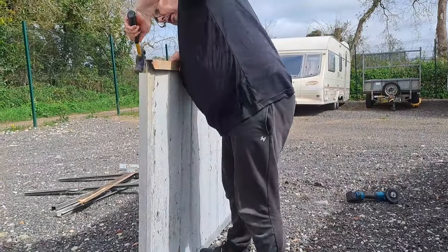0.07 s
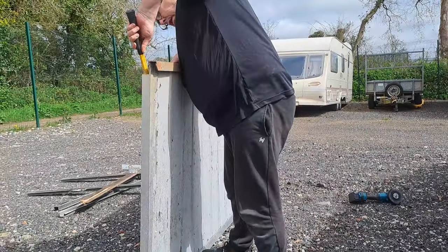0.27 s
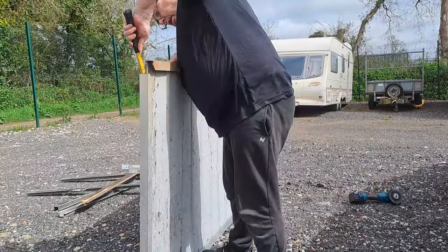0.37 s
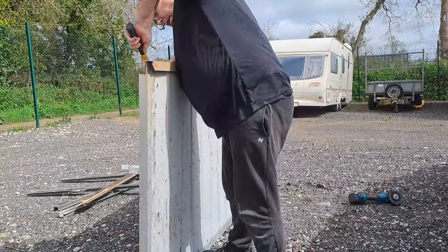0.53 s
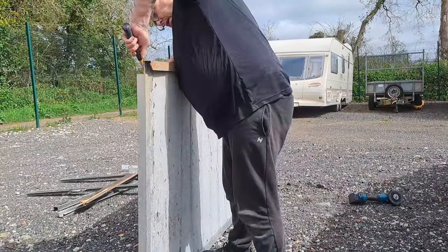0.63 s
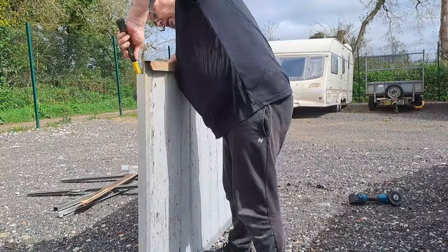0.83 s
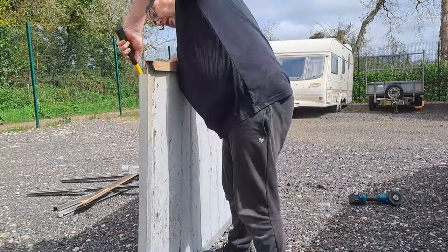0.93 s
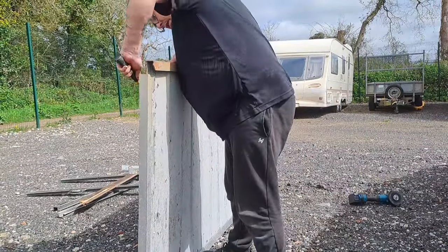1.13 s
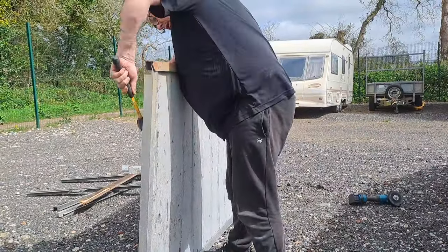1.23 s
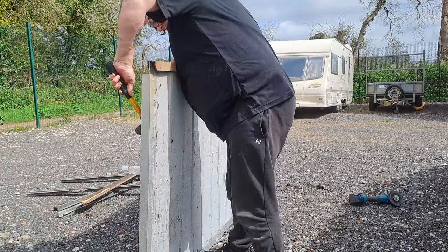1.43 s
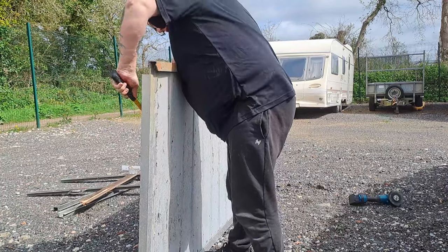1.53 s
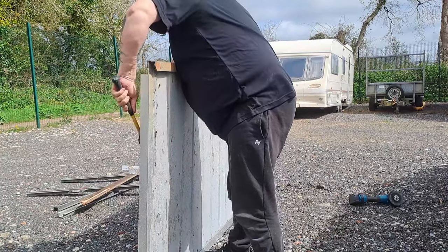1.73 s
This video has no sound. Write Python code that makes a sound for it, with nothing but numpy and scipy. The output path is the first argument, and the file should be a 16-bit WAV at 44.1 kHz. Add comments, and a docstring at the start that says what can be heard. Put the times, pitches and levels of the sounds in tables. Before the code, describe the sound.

Three hammer blows land on long steel sheets close to the microphone, as an earlier hit dies away. Every sharp crack opens into a metallic crash, with a low boom and rattling sheets, in a quiet outdoor yard.

```python
"""A hammer strikes the edge of an upright stack of long steel sheets three times, close by and outdoors.
Each impact gives a bright crack and excites densely spaced bending modes, heard as a crash; the low
modes build up late and boom on. The loose sheets flex, buckle, clap and chatter until they settle
and damp one another. An earlier blow is still dying away at first, over faint open air."""
import sys
import numpy as np
from scipy.fft import rfft, irfft, next_fast_len
from scipy.io import wavfile
from scipy.ndimage import map_coordinates

SR = 44100
rng = np.random.default_rng(int(sys.argv[2]) if len(sys.argv) > 2 else 0)


def inscribe(sig):
    """Save sig as 16-bit PCM at rate SR to the path in sys.argv[1].

    A 1-D sig is mono; a 2-D sig holds one channel per row.
    Samples are clipped to [-1, 1] before scaling.
    """
    pcm = np.round(np.clip(np.atleast_2d(sig).T, -1, 1) * 32767)
    wavfile.write(sys.argv[1], SR, pcm.astype(np.int16))


N = 79380


def amp(db):
    """Amplitude ratio of a level in decibels."""
    return 10 ** (np.asarray(db) / 20)


def unit(x):
    """Normalisation to an rms of 1."""
    return x / np.sqrt(np.mean(x ** 2) + 1e-20)


def along(points, hz):
    """Interpolation of (Hz, value) points on a logarithmic frequency axis."""
    freqs, values = np.transpose(points)
    return np.interp(np.log(hz + 1), np.log(freqs + 1), values)


def above(hz, edge_hz):
    """High-pass weighting: a smooth step from 0 to 1."""
    return 1 - 1 / (1 + (hz / edge_hz) ** 4)


def filtered(x, response):
    """Linear filtering: the spectrum times a frequency response."""
    size = next_fast_len(N + SR // 4)
    return irfft(rfft(x, size) * response(np.fft.rfftfreq(size, 1 / SR)), size)[..., :N]


def wobble(knots_per_s):
    """Smooth random modulation."""
    return map_coordinates(rng.standard_normal(N // 16), [np.arange(N) * knots_per_s / SR], mode="wrap")


def since(start):
    """Seconds after the start, zero before it."""
    return np.maximum(np.arange(N) / SR - start, 0)


def ring(t, rise_s, t60_s):
    """Envelope of a damped resonator: a soft rise and an exponential decay."""
    return (1 - np.exp(-t / rise_s)) * amp(-60 * t / t60_s)


def ripple(hz, spacing_hz, depth_db):
    """Uneven excitation: each contact favours other modes, leaving random peaks and gaps in the treble."""
    knots = rng.standard_normal(SR // 32)
    peaks = np.interp(hz / spacing_hz, np.arange(len(knots)), knots) * np.sqrt(1.5)
    return amp(depth_db * above(hz, 1400) * peaks)


# Likeness of the two channels. Each row: frequency in Hz, correlation from -1 to 1.
CORRELATION = [(30, .68), (130, .92), (260, .95), (500, .86), (1000, .78), (2000, .63), (4000, .08),
               (8000, -.08), (13000, .1)]


def wide_noise(gain):
    """Spatial coherence: an extended source is alike left and right in the bass, unrelated in the treble."""
    def mid_and_side(hz):
        angle = np.arccos(np.clip(along(CORRELATION, hz), -1, 1)) / 2
        return gain(hz) * np.array([np.cos(angle), np.sin(angle)])
    mid, side = filtered(rng.standard_normal((2, N)), mid_and_side)
    return unit(np.array([mid + side, mid - side]))


# Spectrum of the open air. Each row: frequency in Hz, relative level in dB.
AIR_SPECTRUM = [(20, -6.5), (50, -1), (110, -20.5), (220, -9.5), (700, -13), (2000, -31), (6000, -39.5),
                (16000, -55)]


def open_air():
    """Ambient noise: a faint low rumble whose level wanders."""
    return amp(-56.5 + 3.5 * wobble(6.5)) * wide_noise(lambda hz: amp(along(AIR_SPECTRUM, hz)))


# Bowing of the sheets. Each row: start in seconds, relative level in dB.
FLEXES = [(.005, -32), (.087, -31.5), (0.217, -18), (.32, -28), (0.419, -22.5), (0.577, -34.5),
          (.662, -34.5), (.74, -26), (.845, -22), (.965, -35), (1.242, -34.5), (1.33, -32), (1.46, -35),
          (1.54, -32)]
# Spectrum of a thump. Each row: frequency in Hz, relative level in dB.
FLEX_SPECTRUM = [(20, -25), (45, -4), (65, 1.5), (90, -2.5), (120, 0), (170, -15), (300, -19.5),
                 (1000, -54.5), (4000, -100)]


def flexes():
    """Flexural motion: the long sheets bow and radiate soft low thumps."""
    envelope = sum(amp(db) * ring(since(start), rise_s=.0081, t60_s=.29) for start, db in FLEXES)
    return envelope * wide_noise(lambda hz: amp(along(FLEX_SPECTRUM, hz)))


# Rebounds of the hammer head onto a sheet edge. Each row: start in seconds, relative level in dB.
CLANKS = [(.788, -10.5), (1.3305, -19), (1.4095, -14)]
# Modes of an edge. Each row: frequency in Hz, relative level in dB.
EDGE_MODES = [(2480, -9), (3030, -8), (3220, -2.5), (3400, -4), (3590, -2.5), (3760, -6), (3920, 1.5),
              (4080, -5.5), (4520, -11), (5230, -10)]
CONTACT_RISE_S = .0014


def clanks():
    """Free vibration: a struck edge rings briefly, each mode with its own phase in each channel."""
    out = np.zeros((2, N))
    for start, db in CLANKS:
        t = since(start)
        tones = sum(amp(level) * np.sin(2 * np.pi * (hz * t + rng.random((2, 1))))
                    for hz, level in EDGE_MODES)
        out += amp(db - 1.5) * ring(t, CONTACT_RISE_S, t60_s=.031) * tones
    return out


# Collisions between sheets. Each row: start in seconds, relative level in dB, treble gain in dB.
CLAPS = [(0.01, -34, -7.5), (0.084, -43, -5.5), (.161, -36.5, -13.5), (0.2289, -8.5, -3.5),
         (0.267, -20.5, -4), (0.303, -28, 3.5), (0.339, -25.5, -2), (0.409, -29.5, -5), (0.444, -39.5, 7),
         (0.4564, -30.5, 4), (0.478, -29, -8.5), (.504, -35, -3), (0.519, -38, -22), (0.576, -43.5, 1),
         (0.599, -39.5, -3), (0.631, -46, -9), (.677, -52, -8), (0.761, -19.5, 5.5), (0.787, -18, 1),
         (0.801, -15, -8), (.867, -26, 3.5), (0.892, -32, -1.5), (0.929, -36, 1), (0.976, -38, 6),
         (0.984, -46, 4), (1.007, -35.5, 1), (1.0754, -34.5, -5.5), (1.118, -35, -6.5), (1.298, -23.5, 7.5),
         (1.3312, -12, -1), (1.4087, -31, 12.5), (1.451, -31, 4.5), (1.476, -24, -18), (1.502, -27, -2.5),
         (1.528, -33, 6), (1.559, -28, -5.5), (1.586, -34.5, 2.5), (1.627, -32.5, -7), (1.706, -48.5, -0.5)]
# Spectrum of a clap. Each row: frequency in Hz, relative level in dB.
CLAP_SPECTRUM = [(100, -16.5), (400, -1.5), (1500, 0.5), (2600, -3), (3300, 0.5), (3750, -7.5), (4100, 1.5),
                 (4500, -9.5), (5200, -8.5), (8500, -15.5), (12000, -11.5), (16000, -24.5)]


def claps(places=4):
    """Impact noise: swinging sheets collide at a few places in turn, each slap a short metallic burst."""
    out = np.zeros((2, N))
    for place in range(places):
        burst = wide_noise(lambda hz: amp(along(CLAP_SPECTRUM, hz)) * ripple(hz, 130, depth_db=3.5))
        highs = filtered(burst, lambda hz: above(hz, 3000))
        for start, db, treble in CLAPS[place::places]:
            body = ring(since(start), CONTACT_RISE_S, t60_s=.089)
            snap = amp(-3) * ring(since(start), CONTACT_RISE_S, t60_s=.0096)
            out += amp(db + 1.5) * (body + snap) * (burst + (amp(treble) - 1) * highs)
    return out


# Resonances of buckling sheets. Each row: start in seconds, frequency in Hz, relative level in dB.
BARKS = [(.225, 228, -19), (.228, 895, -16), (0.26, 1380, -20.5), (.735, 440, -24), (.738, 1000, -23.5),
         (.735, 2280, -24), (1.283, 252, -11), (1.284, 440, -13.5), (1.283, 925, -26)]


def barks():
    """Buckling: just after a blow, a few resonances sound as short hollow tones."""
    out = np.zeros(N)
    for start, hz, db in BARKS:
        t = since(start)
        out += amp(db) * ring(t, rise_s=.0049, t60_s=.17) * np.sin(2 * np.pi * (hz * t + rng.random()))
    return out


def strike_colour_db(hz, bass, low_mid, treble):
    """Point of excitation: where a blow lands sets how strongly each register responds."""
    low_mid_band = np.exp(-np.log2(hz / 328) ** 2)
    return bass * (1 - above(hz, 125)) + low_mid * low_mid_band + treble * above(hz, 13700)


def settling(t, settle_s, hz, db_per_s=160):
    """Contact damping: sheets lying together again damp one another above the bass."""
    return amp(-db_per_s * np.maximum(t - settle_s, 0) * above(hz, edge_hz=150))


# Hammer blows, driving the boom, crash and crack. Each row: start in seconds, relative level in dB,
# crack, bass, low-mid and treble gains in dB, crash hold in seconds, tail gain in dB,
# delay before settling in seconds.
BLOWS = [(-.33, -4, -4, -13, 0, -2.5, .04, 1.5, 0.66), (0.2034, 0, 1.5, -6, -2.5, -3, 0.023, -3.5, 0.37),
         (0.7295, 0.5, 3, -5, -1.5, -2.5, 0.025, 0, 0.41), (1.273, -0.5, 2, 0.5, -1.5, 2, 0.045, 4, 0.39)]
# Strongest modes of the stack. Each row: frequency in Hz, relative level in dB, T60 in seconds.
STRONG_MODES = [(110.9, -25.5, 0.42), (122.1, -21, 1.16), (134.5, -28.5, 1.46), (219.7, -30.5, .6),
                (238, -35, 0.4), (413, -33.5, 0.56), (506, -35, 0.53), (541, -40, 1.1), (756, -39.5, 0.28),
                (911, -27.5, 0.72), (1220, -33, 0.45), (1394, -37.5, 0.39), (1540, -35, 0.88),
                (2235, -36, 0.97)]


def boom(swell_cycles=4, scatter_db=1.5):
    """Modal resonance: single modes stand out of the crash, the lowest building up most slowly."""
    out = np.zeros((2, N))
    for start, db, _, bass, low_mid, treble, _, tail, settle in BLOWS:
        t = since(start)
        for hz, level, t60 in STRONG_MODES:
            colour_db = strike_colour_db(hz, bass, low_mid, treble)
            gain = amp(db + tail / 2 + level + colour_db + scatter_db * rng.standard_normal())
            envelope = ring(t, swell_cycles / hz, t60) * settling(t, settle, hz)
            out += gain * envelope * np.sin(2 * np.pi * (hz * t + rng.random()))
    return out


# Bunches of modes. Each row: centre in Hz, half width in Hz, gain in dB.
CLUSTERS = [(116.5, 14, 11), (245.4, 25, 4.5), (438.2, 25, 2.5), (520, 12, 4.5), (762, 28, 3),
            (879, 100, 3), (1458, 79, 5), (1550, 49, 5), (1750, 99, 3), (2288, 97, 7), (3700, 1200, 2.5),
            (4780, 63, 0), (7000, 130, 1.5), (7670, 200, -1.5), (12400, 390, 0.5)]


def clusters(hz):
    """Modal clustering: bunched modes form the broad resonances of the stack."""
    return amp(sum(db * np.exp(-((hz - centre) / width) ** 2) for centre, width, db in CLUSTERS))


# Bands of dense modes. Each row: centre in Hz, relative crash level in dB, crash T60 in seconds,
# relative tail level in dB, tail T60 in seconds, swell time in seconds.
SHEET_BANDS = [(25, -61.5, .5, -60.5, 1.5, .03), (45.6, -40.5, 0.36, -47, 0.77, 0.034),
               (71, -25, 0.55, -33.5, 1.4, 0.036), (121, -29, 0.43, -33, 1.46, 0.02),
               (165, -26, 0.63, -39, 1.4, 0.026), (263, -27, 0.69, -34, 1.38, 0.0047),
               (518, -21.5, 0.41, -24, 1, 0.0037), (1025, -21, 0.5, -28.5, 1.114, 0.0028),
               (1950, -21.5, 0.41, -28.5, 0.98, 0.00203), (3780, -22, 0.36, -33, 0.77, 0.00058),
               (8100, -28, 0.16, -39.5, 0.8, 0.0015), (12100, -28, 0.48, -41, .8, .001),
               (16000, -31, 0.2, -55, .7, .001)]


def sheet_crash():
    """Modal overlap: countless modes merge into noise, a held crash that falls fast to a chattering tail."""
    centres = [row[0] for row in SHEET_BANDS]
    chatter_db = 4.5 * wobble(knots_per_s=130)
    out = np.zeros((2, N))
    for start, db, _, bass, low_mid, treble, hold, tail, settle in BLOWS:
        t = since(start)
        modes = wide_noise(lambda f: clusters(f) * ripple(f, 55, depth_db=3))
        for weights, row in zip(np.eye(len(centres)), SHEET_BANDS):
            hz, crash_db, crash_t60, tail_db, tail_t60, swell = row
            band = unit(filtered(modes, lambda f: along(list(zip(centres, weights)), f)))
            crash = amp(crash_db - 60 * np.maximum(t - hold, 0) / crash_t60)
            chatter = amp(tail_db + tail - 60 * t / tail_t60 + chatter_db * above(hz, 2000))
            onset = 1 - np.exp(-(t / swell) ** 2)
            envelope = onset * np.hypot(crash, chatter) * settling(t, settle, hz)
            out += amp(db - 1.5 + strike_colour_db(hz, bass, low_mid, treble)) * envelope * band
    return out


# Spectrum of the hammer's contact. Each row: frequency in Hz, relative level in dB.
CRACK_SPECTRUM = [(150, -14.5), (700, -1.5), (2000, -1.5), (4500, -9.5), (6700, 3.5), (9000, -3),
                  (11500, 0.5), (15500, -5)]


def hammer_crack(left_lead_s=.000055):
    """Impulsive excitation: brief steel-on-steel contact gives a broadband crack, different each time."""
    # The hammer is a little to the left, so its sound arrives there first.
    lead = lambda hz: np.exp(1j * np.pi * hz * left_lead_s * np.array([[1], [-1]]))
    steel = lambda hz: amp(along(CRACK_SPECTRUM, hz)) * ripple(hz, 260, depth_db=3.5)
    out = np.zeros((2, N))
    for start, db, crack_db, *_ in BLOWS[1:]:
        direct = unit(filtered(rng.standard_normal(N), lead))
        diffuse = amp(-2) * wide_noise(np.ones_like)
        crack = unit(filtered(direct + diffuse, steel))
        out += amp(db + crack_db - 3.5) * ring(since(start), rise_s=.0041, t60_s=.036) * crack
    return out


# Stereo balance of the stack. Each row: frequency in Hz, left minus right level in dB.
BALANCE = [(40, 0), (100, -1.2), (250, -1.5), (600, 0), (4000, 1), (12000, 0)]


def scene():
    """Superposition: hammer, stack and open air add in two channels."""
    stack = sheet_crash() + boom() + barks() + flexes() + claps() + clanks()
    balance = lambda hz: amp(along(BALANCE, hz) * np.array([[.5], [-.5]]))
    return hammer_crack() + filtered(stack, balance) + open_air()


def record(dry, cutoff_hz=15900):
    """Soft saturation rounds the highest peaks; a steep low-pass limits the bandwidth."""
    rounded = dry / (1 + np.abs(dry) ** 6) ** (1 / 6)
    return filtered(rounded, lambda hz: 1 / (1 + (hz / cutoff_hz) ** 160))


dry = scene()
out = record(dry)
inscribe(out)
```